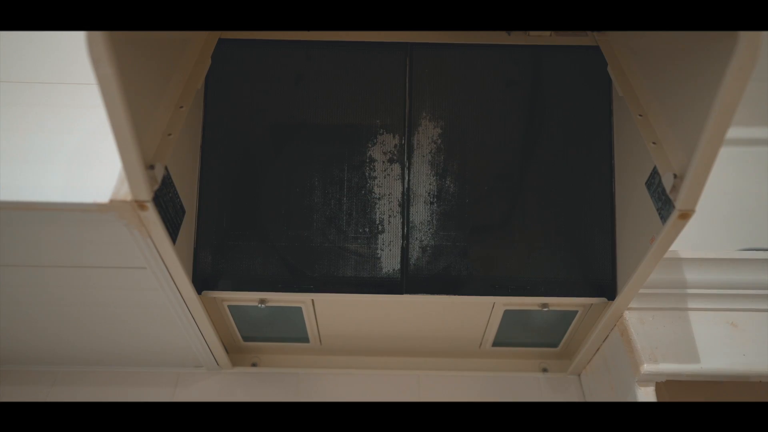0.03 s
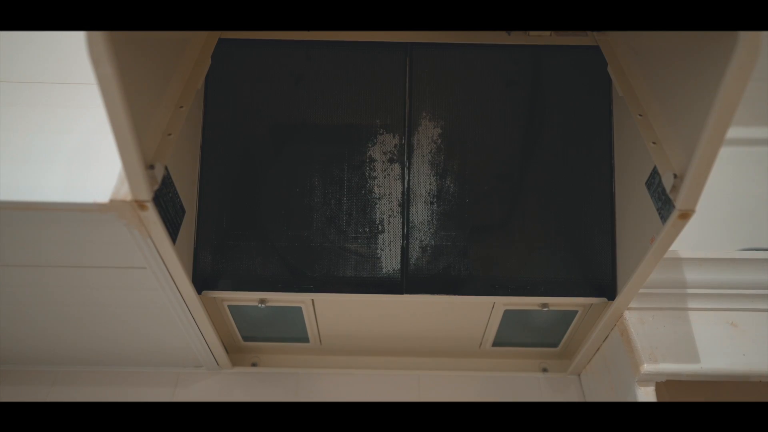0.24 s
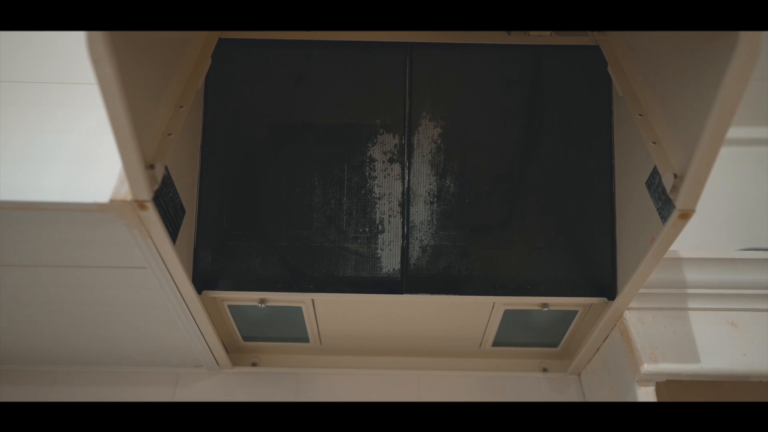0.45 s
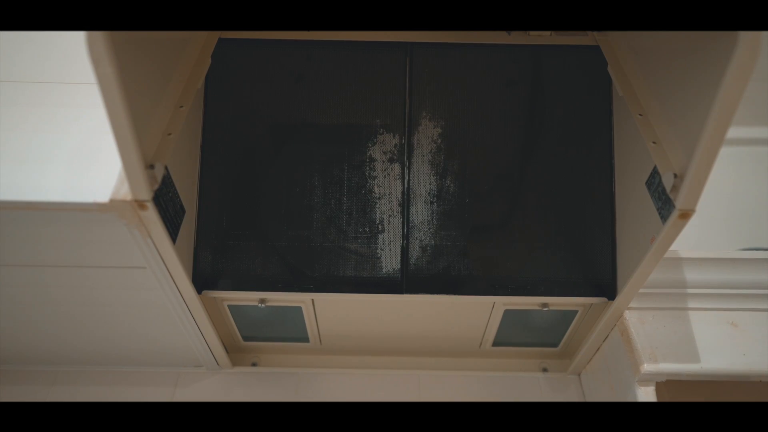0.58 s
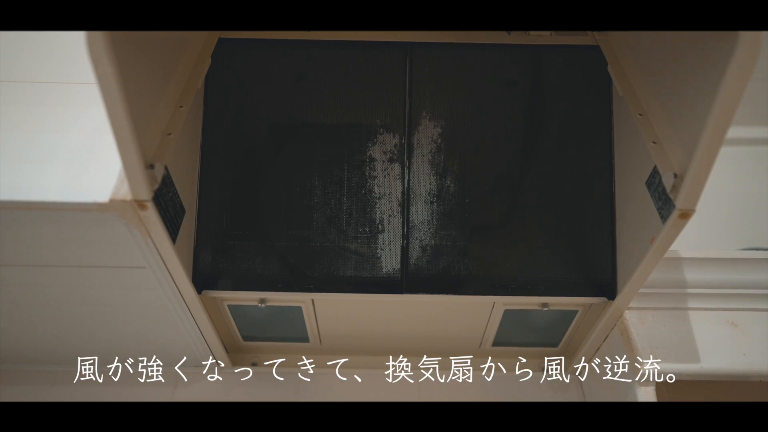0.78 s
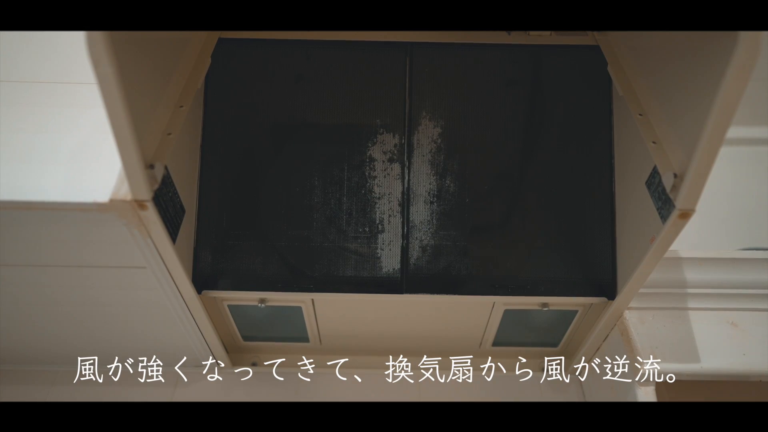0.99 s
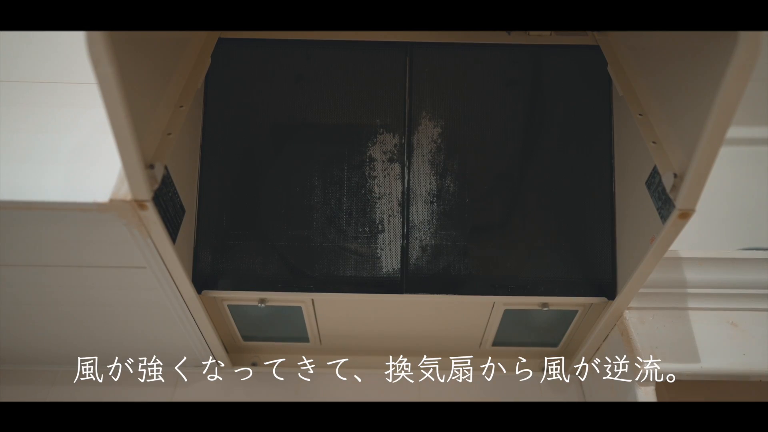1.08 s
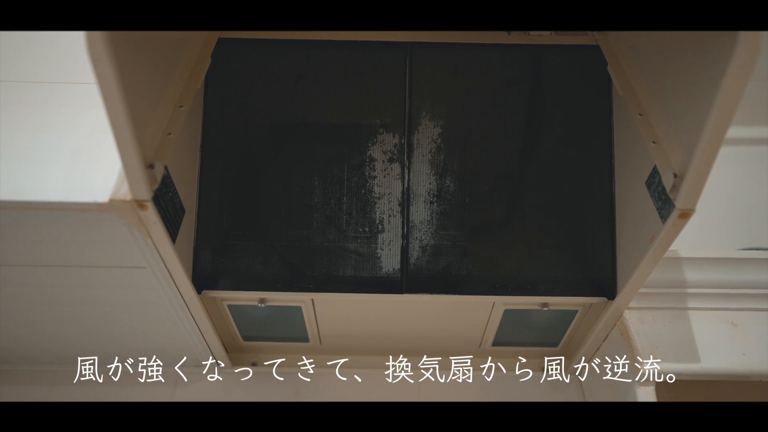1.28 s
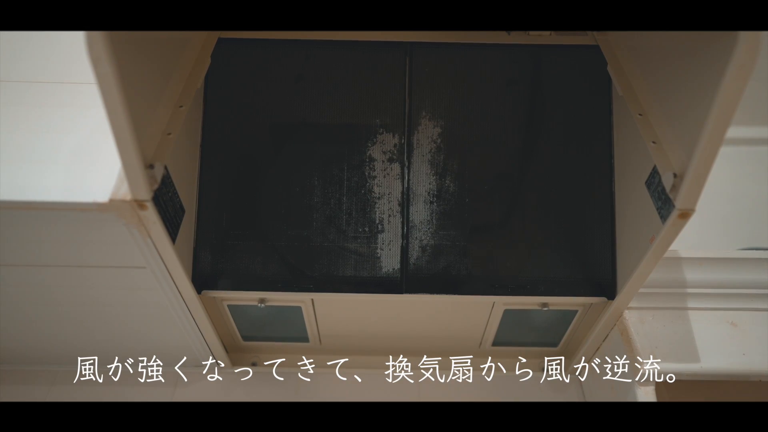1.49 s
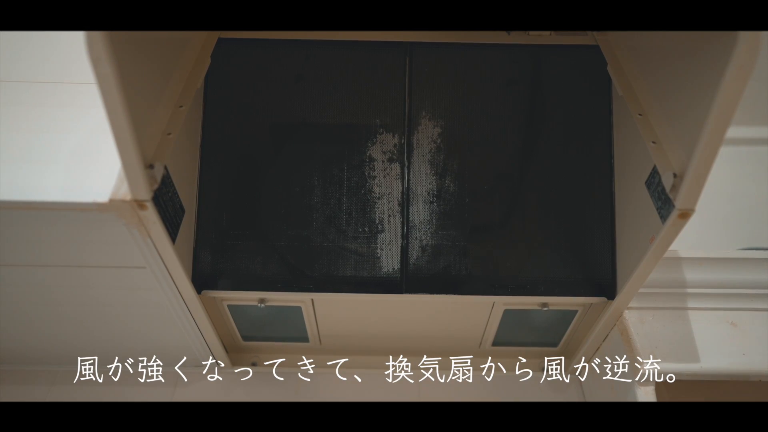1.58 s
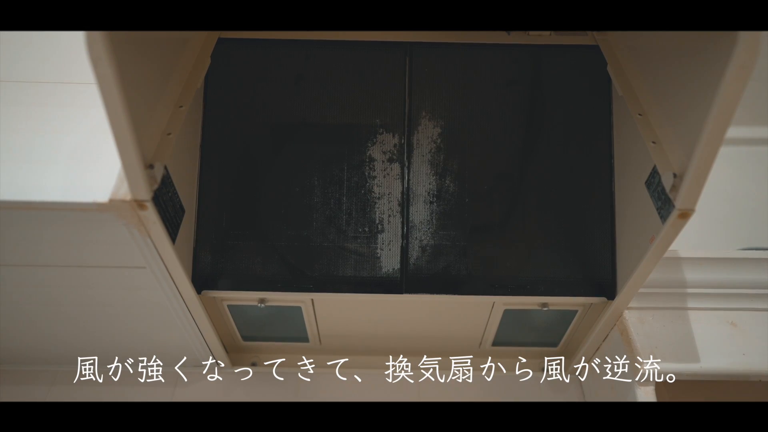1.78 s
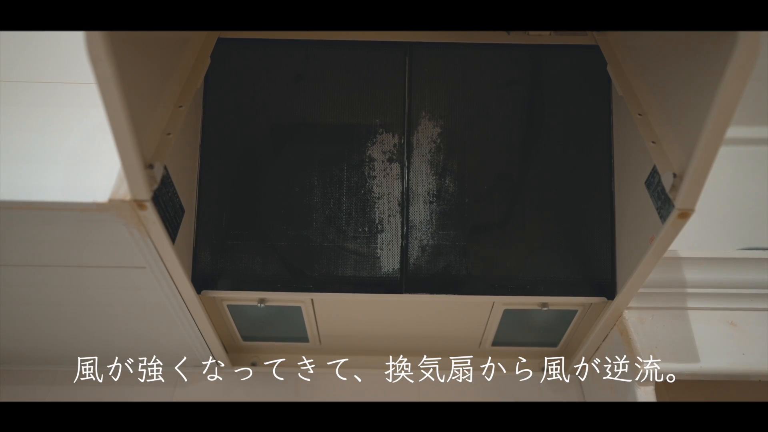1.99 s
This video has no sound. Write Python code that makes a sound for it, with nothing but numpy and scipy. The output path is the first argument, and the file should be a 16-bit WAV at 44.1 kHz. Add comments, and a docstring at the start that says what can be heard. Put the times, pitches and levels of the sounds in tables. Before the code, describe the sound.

A vent flap in a kitchen extractor hood slams and bounces, then slams again, each time setting the sheet metal ringing briefly. Wind rushes and rumbles unevenly in the duct behind it, heard from below the hood.

```python
"""The vent flap of a kitchen extractor hood slams twice in a strong wind blowing back down the duct.
Each time it bounces on its frame, setting the sheet-metal hood and the small room ringing.
Behind the bangs, air rushes through the vent and the duct booms unevenly, with two soft puffs.
Heard in the kitchen from below the hood, on one microphone with a faint hiss."""
import sys
import numpy as np
from scipy import signal
from scipy.fft import rfft, irfft, next_fast_len
from scipy.io import wavfile

SR = 44100
rng = np.random.default_rng(int(sys.argv[2]) if len(sys.argv) > 2 else 0)


def file_out(sig):
    """Save sig as 16-bit WAV at sys.argv[1]."""
    # one column per channel
    cols = np.atleast_2d(sig).T
    # limit, then scale
    lim = np.clip(cols, -1, 1)
    pcm = np.round(lim * 32767).astype(np.int16)
    wavfile.write(sys.argv[1], SR, pcm)


N = 90404
T = np.arange(N) / SR
FFT_SIZE = next_fast_len(N)
FFT_HZ = np.arange(FFT_SIZE // 2 + 1) * SR / FFT_SIZE

# noise colours of microphone, vent air and duct buffeting: f/Hz, relative density/dB
HISS_COLOUR = [(3000, -2), (7500, -7.5), (10000, -7), (14000, -2.5), (16000, 0)]
RUSH_COLOUR = [(200, -0.5), (275, -4), (345, 3.5), (440, -2.5), (540, -2), (750, -4.5), (1100, -8.5),
               (1420, -14), (1600, -16.5), (2000, -21.5), (2500, -29.5), (2980, -32), (3500, -36.5),
               (5000, -45.5), (7000, -59), (16000, -80)]
RUMBLE_COLOUR = [(12, -43.5), (22, -38), (35, -12.5), (55, 11), (68, 14.5), (84, 17), (105, 21), (125, -1),
                 (200, 1.5), (300, -9.5), (600, -66.5)]
# course of the vent air, the buffeting and the duct's resonances: t/s, level/dB
RUSH_LEVEL = [(0, -41), (.3, -43), (.55, -43.5), (.75, -42), (.95, -41), (1.15, -43.5), (1.55, -43.5),
              (1.85, -42), (2.05, -42)]
RUMBLE_LEVEL = [(0, -29.5), (.1, -31.5), (.2, -34.5), (.4, -36.5), (.485, -38.5), (.57, -41), (.85, -43),
                (.98, -38), (1.12, -41.5), (1.22, -33.5), (1.31, -28.5), (1.45, -39), (1.7, -34),
                (1.87, -42), (1.96, -31), (2.05, -48.5)]
BOOM_LEVEL = [(0, 4), (.35, 7), (.57, -2.5), (.67, 4), (.8, 1.5), (.98, 6), (1.15, -1.5), (1.32, 1),
              (1.45, 3.5), (1.8, -2.5), (2.05, 2)]
# air resonances of the duct: f/Hz, half-width/Hz, relative level/dB
DUCT_MODES = [(95.4, 14, -62.5), (157, 23.2, -41.5), (350, 31, -55.5), (546.3, 17, -52.5),
              (1622, 46, -62.5), (2940, 20, -78)]
# pressure puffs in the duct: t/s, level/dB
PUFFS = [(.478, -23), (1.03, -24)]
# early reflections in the hood, late ringing of duct and room: f/Hz, relative density/dB
EARLY_COLOUR = [(100, -2.5), (200, -15), (280, -14.5), (360, 1), (480, -1.5), (610, -13), (930, -2),
                (1170, -10), (1400, -6.5), (1700, -8), (1950, -17.5), (2330, -25.5), (2680, -23),
                (4000, -35), (6500, -54.5), (16000, -75.5)]
LATE_COLOUR = [(70, -27.5), (170, 11.5), (280, -17.5), (370, -1), (500, -1.5), (610, -0.5), (760, 2),
               (930, -19.5), (1170, -20), (1650, -16), (1900, -34), (2330, -26.5), (2650, -27.5),
               (4000, -25), (5200, -38.5), (6500, -55.5), (16000, -51)]
# decay of the late ringing: f/Hz, t60/s
LATE_T60 = [(100, 0.37), (400, 0.51), (1000, 0.53), (2000, 0.59), (4000, 0.23), (12000, 0.091)]
# modes of flap and hood, one list each: f/Hz, relative level/dB, t60/s
PANEL_HZ = [176, 241, 334, 365, 445, 492, 549, 676, 779, 809, 910, 998, 1090, 1265, 1388, 1495, 1597, 1695,
            2690]
PANEL_DB = [-32.5, -24, -20, -19.5, -24, -29.5, -29, -26, -25.5, -28.5, -17.5, -30, -28.5, -34.5, -27.5,
            -36, -24, -28.5, -38.5]
PANEL_T60 = [0.9, 0.63, .55, 0.57, 0.54, 0.39, 0.51, 0.46, 0.25, 0.56, 0.36, 0.35, 0.33, 0.23, 0.26, .32,
             0.26, 0.18, 0.19]
# the flap hits its frame: t/s, level/dB, extra bass/dB, extra treble/dB
FLAP_HITS = [(0.213, 0, 0, 2.5), (.2355, -3, -12.5, 4), (0.3113, -5.5, 0, -11), (.359, -12, -5.5, -12),
             (.409, -17, -4.5, -24.5), (1.6351, -1.5, 0, -3), (1.6465, -13, -6, -10),
             (1.7120, -6, -4.5, -13.5), (1.761, -17.5, 7, -14.5)]


def from_db(db):
    """Decibels to gain."""
    return 10 ** (np.asarray(db) / 20)


def rms_one(x):
    """Scale to unit rms."""
    return x / np.sqrt(np.mean(x ** 2) + 1e-20)


def in_time(rows):
    """Read a table at every sample."""
    return np.interp(T, *np.transpose(rows))


def at_hz(points, hz):
    """Read a table on a log-frequency axis."""
    f, value = np.transpose(points)
    return np.interp(np.log(np.maximum(hz, 1)), np.log(f), value)


def noise(gain_at):
    """Unit-rms noise shaped by a gain at each frequency."""
    phases = np.exp(2j * np.pi * rng.random(len(FFT_HZ)))
    return rms_one(irfft(gain_at(FFT_HZ) * phases, FFT_SIZE)[:N])


def coloured(spectrum):
    """Unit-rms noise with a tabled colour."""
    return noise(lambda hz: from_db(at_hz(spectrum, hz)))


def dying(t60, rise_s):
    """Quick rise, then exponential decay."""
    return (1 - np.exp(-T / rise_s)) * np.exp(-np.log(1000) * T / t60)


def bandpass(x, band_hz, order):
    """Butterworth band-pass."""
    return signal.sosfilt(signal.butter(order, band_hz, "band", fs=SR, output="sos"), x)


def struck(ring, hz, power=1, bass_hz=563, treble_hz=3220):
    """Start a ring at every flap hit, as strongly as the hit excites that pitch; power 2 sums energy."""
    out = np.zeros(N)
    bass_share = 1 / (1 + (hz / bass_hz) ** 4)
    treble_share = 1 / (1 + (treble_hz / hz) ** 2)
    for s, db, bass_db, treble_db in FLAP_HITS:
        start = int(s * SR)
        gain = from_db(db + bass_db * bass_share + treble_db * treble_share)
        out[start:] += gain ** power * ring[:N - start]
    return out


def wind(flutter_hz=12, flutter_db=0.64, rush_gain_db=3):
    """Air rushes through the vent, buffets the duct and excites its resonances."""
    flutter = noise(lambda hz: hz * np.exp(-hz / flutter_hz))
    rush = from_db(in_time(RUSH_LEVEL) + rush_gain_db + flutter_db * flutter) * coloured(RUSH_COLOUR)
    rumble = from_db(in_time(RUMBLE_LEVEL)) * coloured(RUMBLE_COLOUR)
    boom = sum(from_db(db) * noise(lambda f: 1 / (1 + ((f - hz) / width) ** 2))
               for hz, width, db in DUCT_MODES)
    return rush + rumble + from_db(in_time(BOOM_LEVEL)) * boom


def duct_puffs(hz=67):
    """A puff of wind sets the air up in the duct swinging for a few cycles."""
    swing = np.sin(2 * np.pi * hz * T) * dying(t60=0.12, rise_s=0.0089)
    return sum(from_db(db) * np.interp(T - s, T, swing, left=0) for s, db in PUFFS)


def reflections(peak_s=0.014, sharpness=1.28):
    """Early reflections swell inside the hood; duct and kitchen ring on, the treble dying first."""
    spectra = rfft(np.array([coloured(EARLY_COLOUR), coloured(LATE_COLOUR)]), FFT_SIZE)
    swell = from_db(-16.5) * (T / peak_s * np.exp(1 - T / peak_s)) ** sharpness
    edges_hz = np.geomspace(40, 18000, 15)
    out = np.zeros(N)
    for low, high in zip(edges_hz, edges_hz[1:]):
        centre = np.sqrt(low * high)
        in_band = (FFT_HZ >= low) & (FFT_HZ < high)
        early, late = irfft(spectra * in_band, FFT_SIZE)[:, :N]
        tail = from_db(-21) * dying(at_hz(LATE_T60, centre), rise_s=0.0017)
        out += struck(swell * early + tail * late, centre)
    return out


def hood_ring(rise_s=0.008, waver_hz=20, waver_depth=0.25):
    """Every hit feeds energy to the panels above the microphone; their modes waver as they die."""
    out = np.zeros(N)
    for hz, db, t60 in zip(PANEL_HZ, PANEL_DB, PANEL_T60):
        waver = [waver_depth * noise(lambda f: np.exp(-(f / waver_hz) ** 2)) for _ in range(2)]
        phase = 2 * np.pi * (hz * T + rng.random())
        tone = (1 + waver[0]) * np.sin(phase) + waver[1] * np.cos(phase)
        energy = struck(dying(t60, rise_s) ** 2, hz, power=2)
        out += from_db(db) * tone * np.sqrt(energy)
    return out


def flap_slams(thud_hz=368.3, clack_hz=(400, 1940), slap_hz=(600, 1760), crack_hz=4000, tink_hz=5810):
    """The flap strikes its frame: a low thud, a clack with its dry slap, a thin crack and a tink."""
    # the flap's own heavily damped swing
    thud_shape = (1 - np.exp(-T / 0.0012)) * np.exp(-(T / 0.018) ** 2)
    thud = from_db(-7.5) * np.sin(2 * np.pi * thud_hz * T) * thud_shape
    # the instant of contact
    click = bandpass((T == 0) + 1e-18, clack_hz, order=4)
    clack = from_db(-22.5) * click / np.abs(click).max()
    slap_noise = rms_one(bandpass(rng.standard_normal(N), slap_hz, order=3))
    slap = from_db(-22) * slap_noise * dying(t60=0.028, rise_s=0.00035)
    bright_noise = noise(lambda hz: hz / (hz + crack_hz))
    crack = from_db(-48.5) * bright_noise * dying(t60=0.13, rise_s=0.0006)
    # rough metallic ring of the flap's edge
    edge_noise = noise(lambda hz: np.exp(-((hz - tink_hz) / 110) ** 2))
    tink = from_db(-47.5) * edge_noise * dying(t60=0.12, rise_s=0.0023)
    return (struck(thud, thud_hz) + struck(clack + slap, np.mean(slap_hz))
            + struck(crack, 2 * crack_hz) + struck(tink, tink_hz))


def scene():
    """Bangs over wind, in mono from below the hood."""
    return (flap_slams() + hood_ring() + reflections() + wind() + duct_puffs())[None]


def record(dry, stop_hz=16900):
    """The microphone adds a faint hiss; the top is cut."""
    hiss = from_db(-73) * coloured(HISS_COLOUR)
    return signal.sosfilt(signal.cheby2(16, 70, stop_hz, fs=SR, output="sos"), dry + hiss)


dry = scene()
out = record(dry)
file_out(out)
```